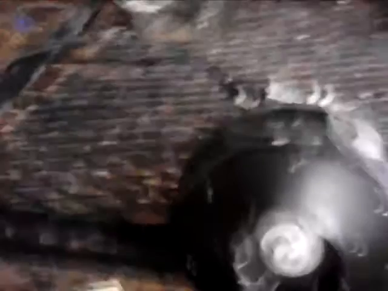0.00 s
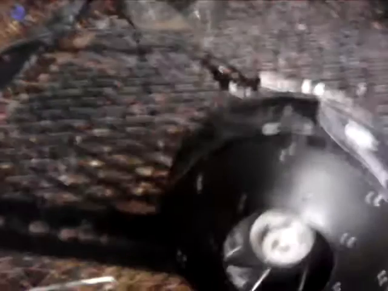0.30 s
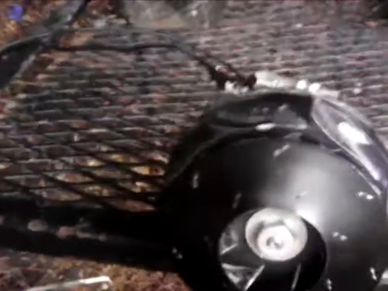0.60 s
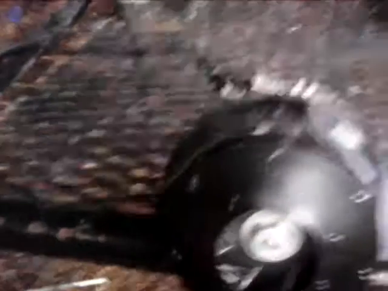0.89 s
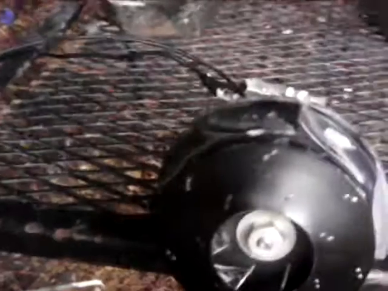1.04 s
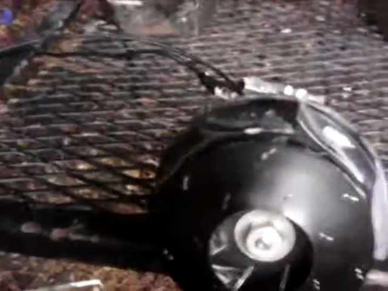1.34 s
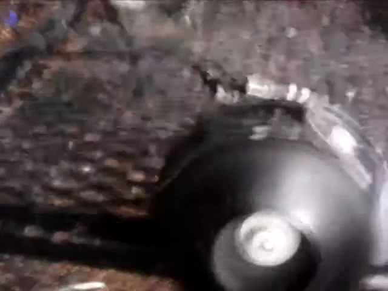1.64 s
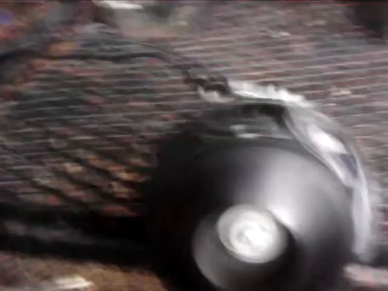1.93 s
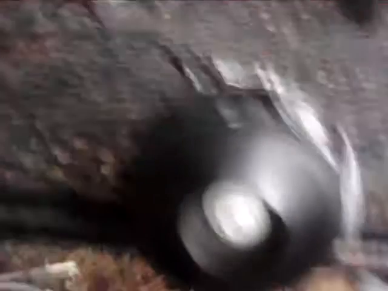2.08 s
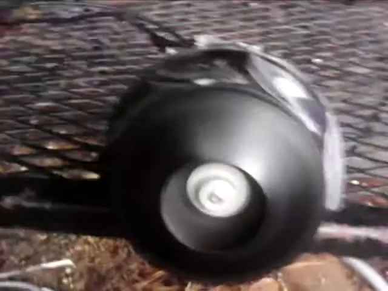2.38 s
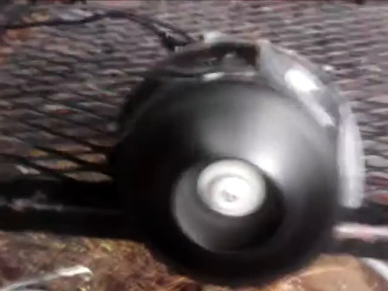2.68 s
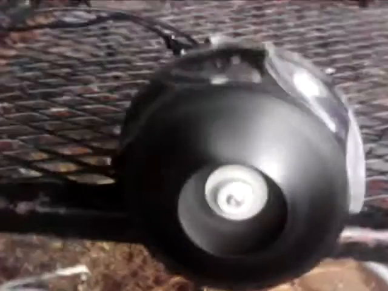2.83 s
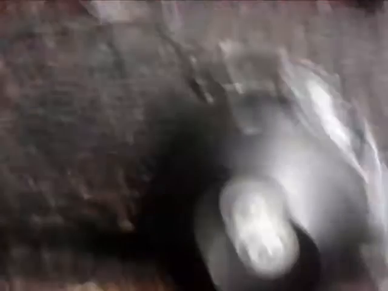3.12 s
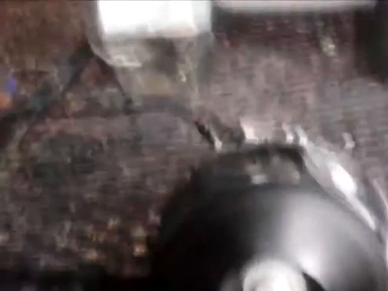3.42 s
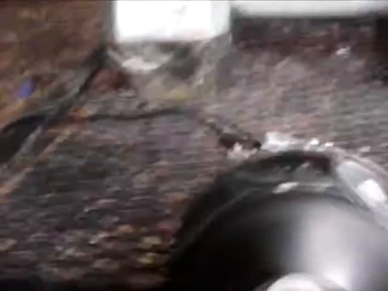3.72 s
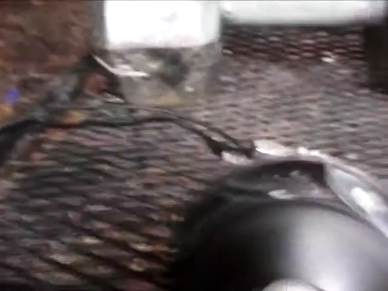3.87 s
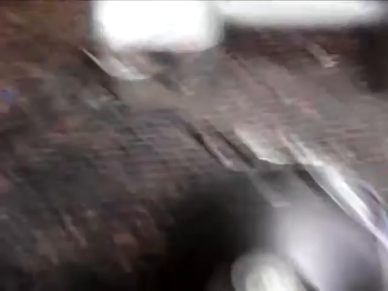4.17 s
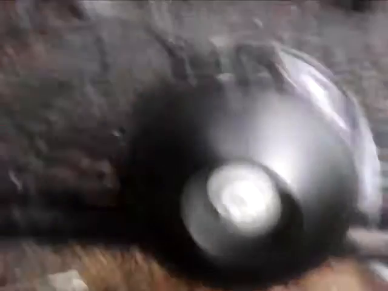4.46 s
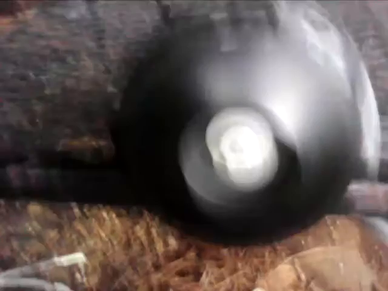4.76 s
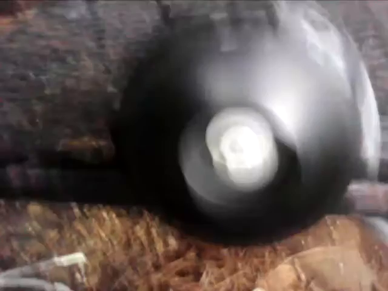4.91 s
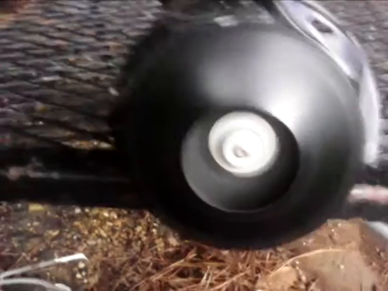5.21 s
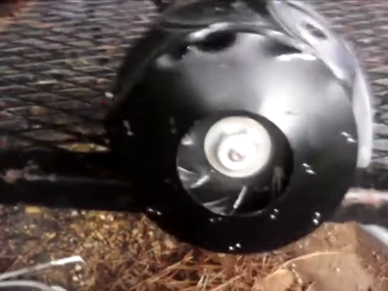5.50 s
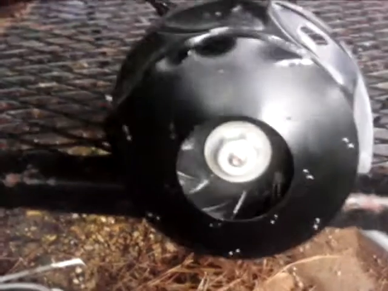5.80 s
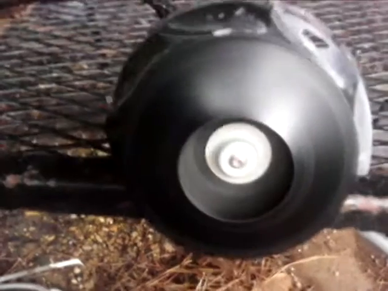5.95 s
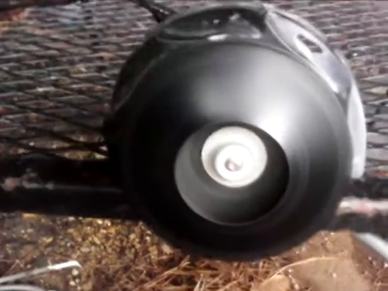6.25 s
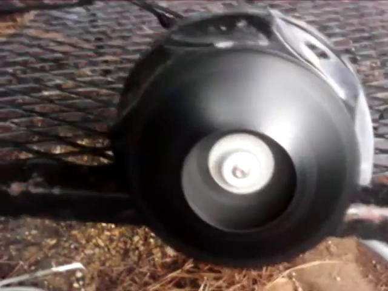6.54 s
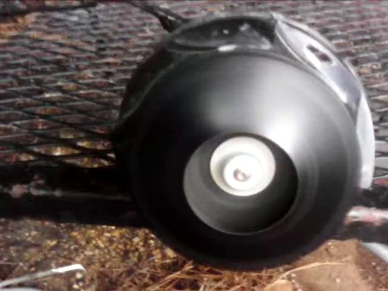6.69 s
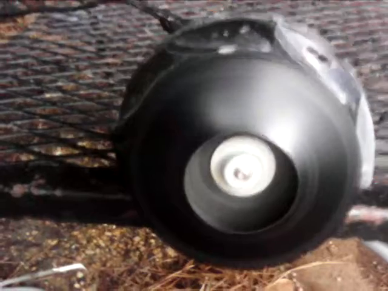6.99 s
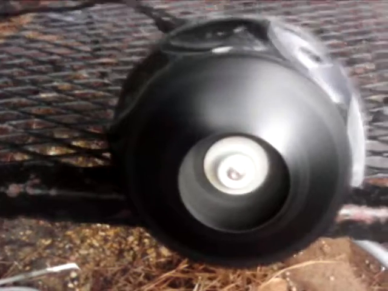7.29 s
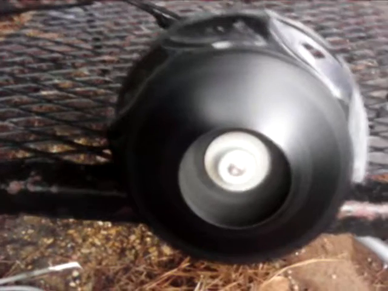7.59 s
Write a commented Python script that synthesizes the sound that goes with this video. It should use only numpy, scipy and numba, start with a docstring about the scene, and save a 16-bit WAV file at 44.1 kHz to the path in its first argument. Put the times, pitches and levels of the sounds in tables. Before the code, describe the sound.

Close up, a small electric fan motor is pulsed on and off, whining and rushing loudly upward, then coasting down each time.

```python
"""A bare vacuum cleaner motor on a mesh table, close to a hand-held mono microphone.
Faint handling ticks come first. From 1 s, three short bursts of current pull the rotor up and drag
slows it again; from 5.3 s, four longer ones follow. At each start the armature slots whine and make
the frame squeak; the fan's rush and the hum of imbalance rise and sink with speed, the brushes rub,
and the draught ruffles the microphone. Gain control holds the loud stretches level."""
import sys
import numpy as np
from scipy import signal
from scipy.fft import rfft, irfft
from scipy.io import wavfile
from numba import njit

SR = 44100
rng = np.random.default_rng(int(sys.argv[2]) if len(sys.argv) > 2 else 0)


def dump_mix(stems):
    """Bounce the given channels to the path in sys.argv[1] as a 16-bit WAV at rate SR."""
    frames = np.atleast_2d(stems).T  # one column per channel
    limited = np.clip(frames, -1, 1)  # hard clip at full scale
    pcm = np.round(limited * 32767).astype(np.int16)
    wavfile.write(sys.argv[1], SR, pcm)


N = 336042
TIME = np.arange(N) / SR

REFERENCE_RPS, PULL_KNEE_RPS, GRIP_RPS, CREEP_RPS = 270, 541.2, 64, 25
START_PULL_RPS_PER_S, PULL_EXPONENT = 10616, 3.94
AIR_RPS_PER_S, BEARING_RPS_PER_S, GRIP_RPS_PER_S = 175, 149.5, 395


@njit
def rotor_speed(torque):
    """Speed [rev/s]: current pulls the rotor up; air, bearings and brush grip brake it."""
    rps, v = np.zeros(len(torque)), 0.
    for i in range(len(torque)):
        pull = torque[i] * START_PULL_RPS_PER_S / (1 + v / PULL_KNEE_RPS) ** PULL_EXPONENT
        air = AIR_RPS_PER_S * (v / REFERENCE_RPS) ** 2
        bearings = BEARING_RPS_PER_S * v ** 2 / (v ** 2 + CREEP_RPS ** 2)
        grip = GRIP_RPS_PER_S * (v / GRIP_RPS) / (1 + (v / GRIP_RPS) ** 6)
        v += (pull - air - bearings - grip) / SR
        rps[i] = v
    return rps


# bursts of current: (on [s], off [s], torque [ratio], whine gain [dB])
BURSTS = [(1.043, 1.113, .957, -.5), (1.364, 1.458, .991, 4), (3.077, 3.199, .958, 3),
          (5.327, 6.02, 1, -.5), (6.214, 6.461, .993, 0), (6.774, 7.003, 1.005, 0), (7.268, 7.7, 1, 0)]


def motor():
    """The switch drives the rotor; speed and current drive each sound of the motor."""
    torque = sum(share * ((TIME > on) & (TIME < off)) for on, off, share, _ in BURSTS)
    whine_db = smooth(sum(db * ((TIME > on) & (TIME < off)) for on, off, _, db in BURSTS), .01)
    rps = np.maximum(rotor_speed(torque), 1e-3)
    speed_oct = np.log2(rps / REFERENCE_RPS)
    angle_rad = 2 * np.pi * np.cumsum(rps) / SR
    supply = smooth(smooth(1. * (torque > 0), .006), .006)
    current = supply / (1 + (rps / 370) ** 3)   # back-voltage lowers it
    flow = from_db(-14 + 13.34 * speed_oct)
    tones = room(flow * rotor_tones(angle_rad, rps), t60_s=.1, wet_db=-9)
    air = flow * fan_rush(speed_oct) + tones + brushes(rps, current)
    return shroud(air, speed_oct) + from_db(whine_db) * magnetic_whine(angle_rad, current)


# fan rush at the reference speed: (frequency [Hz], density [dB])
RUSH_SPECTRUM = [(100, -20), (300, -6.5), (520, -3.5), (760, -2), (1150, 0.5), (1400, -5), (3400, -2),
                 (4500, 3.5), (5300, 1), (7200, 5.5), (8200, -4), (11500, -9), (12700, -18), (13600, -18.5)]


def fan_rush(speed_oct, treble_db_per_oct=8.5, knee_hz=8000):
    """Impeller turbulence; its treble grows with speed."""
    def shelf(hz, s):
        treble_db = treble_db_per_oct * np.interp(s, TIME, np.maximum(speed_oct, -1.5))
        return from_db(treble_db * hz ** 4 / (hz ** 4 + knee_hz ** 4))
    return recolour(noise(RUSH_SPECTRUM), shelf)


# rotor tones: (order [x speed], level [dB], fades below [rev/s])
ROTOR_ORDERS = [(1, -8.5, 190), (2, -16, 227), (3, -20, 260), (4, -24, 110), (5, -22.5, 110),
                (6, -22.5, 100), (7, -19.5, 130), (8, -21, 220), (12, -22.5, 200), (13, -16.5, 100)]
# housing radiation: (frequency [Hz], gain [dB])
HOUSING_RESPONSE = [(70, -8), (180, 0.5), (265, 2.5), (370, -0.5), (470, 0), (620, 0.5), (740, 7),
                    (950, -1), (1250, 0.5), (1850, 1), (2400, -2.5), (3100, 3.5), (3800, -2), (4700, -1),
                    (6000, 4)]


def rotor_tones(angle_rad, rps, ruffle_depth=.15, swing_db=2.4):
    """Imbalance and fan blades sound at multiples of the speed, ruffled by the air."""
    out = np.zeros(N)
    for order, db, fade_rps in ROTOR_ORDERS:
        swing = rms_one(from_db(swing_db * (1 - 1 / order) * wander(.02)))
        ruffle = 1 + ruffle_depth * wander(.003)
        tone = np.sqrt(2) * np.sin(round(order) * angle_rad + rng.uniform(0, 2 * np.pi))
        gain = from_db(db) * at_hz(HOUSING_RESPONSE, order * rps) / (1 + (fade_rps / rps) ** 4)
        out += gain * swing * ruffle * tone
    return out


# frame modes: (frequency [Hz], width [Hz], field-driven gain [dB], brush-rubbed level [dB])
FRAME_MODES = [(1994, 20, 7, 5.5), (2170, 100, -26.5, -1.5), (3300, 380, -10, -12),
               (4120, 280, -3.5, -12.5), (5330, 280, -34, -4), (6695, 350, -32.5, -12.5)]


def magnetic_whine(angle_rad, current, slots=12, chatter_depth=.26, mains_hz=60, hum_db=-26.5):
    """The field tugs at each passing slot; the sweep rings the frame modes in turn, over mains hum."""
    brush_chatter = 1 + chatter_depth * rms_one(smooth(rng.standard_normal(N), .0008))
    pull = current ** 2 * brush_chatter * np.sin(slots * angle_rad)
    ringing = sum(from_db(db) * frame_mode(pull, hz, width_hz, skirt_hz=600)
                  for hz, width_hz, db, _ in FRAME_MODES)
    hum = from_db(hum_db) * current ** 4 * np.sin(2 * np.pi * 2 * mains_hz * TIME)
    return ringing + hum


# brush scrapes as the rotor creeps to rest: (time [s], level [dB])
BRUSH_SCRAPES = [(2.9, -84.5), (4.56, -75)]


def brushes(rps, current, spark_db=-30.5, rub_db=-46.5, grip_db=-33, glide_rps=115):
    """The brushes fizz under current; their friction rings the frame."""
    sparks = from_db(spark_db) * current ** 2 * noise(RUSH_SPECTRUM)
    friction = rng.standard_normal(N)
    ringing = sum(from_db(db) * rms_one(frame_mode(friction, hz, width_hz, skirt_hz=900))
                  for hz, width_hz, _, db in FRAME_MODES)
    rubbing = from_db(rub_db) / (1 + (glide_rps / rps) ** 2.7)
    gripping = from_db(grip_db) * current ** 2
    return sparks + (rubbing + swells(BRUSH_SCRAPES, sigma_s=.11) + gripping) * ringing


# colour at the moving microphone: (time [s], inlet [Hz], notch [Hz], notch depth [ratio], beam [dB])
SHROUD_COLOUR = [(1.2, 2420, 3130, 0.55, -3), (1.7, 2560, 3320, 0.85, -5), (3.3, 2344, 3070, 0.7, -2),
                 (4.2, 2245, 3150, 0.68, -2.5), (5.4, 2550, 3160, 0.54, -4.5), (5.78, 2650, 3160, 0.78, -5),
                 (6.2, 2500, 3140, 0.79, -5)]


def shroud(x, speed_oct, inlet_max_db=7.5, inlet_db_per_oct=6.5, beam_hz=6350):
    """The inlet cavity lifts one band with flow, paths round the shroud cancel another; treble beams."""
    def response(hz, s):
        def bell(centre_hz, width_hz):
            return 1 / (1 + (2 * (hz - centre_hz) / width_hz) ** 2)
        inlet_hz, notch_hz, depth, beam_db = in_time(SHROUD_COLOUR, s)
        inlet_db = inlet_max_db + inlet_db_per_oct * np.clip(np.interp(s, TIME, speed_oct), -1.5, 0)
        gain_db = inlet_db * bell(inlet_hz, width_hz=750) + beam_db * bell(beam_hz, width_hz=2000)
        return from_db(gain_db) * (1 - depth * bell(notch_hz, width_hz=230))
    return recolour(x, response)


# microphone rumble: (frequency [Hz], density [dB])
RUMBLE_SPECTRUM = [(20, 3.5), (40, -0.5), (65, -5.5), (100, -2), (170, -10.5), (280, -18.5), (600, -21.5),
                   (2000, -45)]
# low thumps on the microphone, from gusts of air or handling: (time [s], level [dB])
MIC_THUMPS = [(1.97, -25), (4.04, -34), (4.48, -58), (6.981, -24), (7.151, -36.5)]
# handling rumble: (time [s], level [dB])
HANDLING_LEVELS = [(0, -69.5), (.5, -66.5), (1.0, -58), (2.7, -60.5), (3.0, -65.5), (4.5, -54), (5.0, -65),
                   (5.3, -62)]


def draught(rps, level_db=-36, gust_db=1.7, gust_s=.027, fade_rps=53, air_lag_s=.044):
    """The fan's outflow ruffles the microphone, over low thumps and handling rumble."""
    flow = 1 / (1 + (fade_rps / rps) ** 4)
    outflow = from_db(level_db + gust_db * wander(gust_s)) * flow * smooth(flow, air_lag_s)
    thumps = swells(MIC_THUMPS, sigma_s=.0073)
    handling = from_db(in_time(HANDLING_LEVELS)[0])
    return (outflow + thumps + handling) * noise(RUMBLE_SPECTRUM)


# handling ticks: (time [s], level [dB])
TICK_EVENTS = [(0.171, -42), (0.41, -57), (0.582, -58), (0.709, -51), (0.732, -49), (0.841, -51),
               (0.854, -50)]
# modes of a tick: (frequency [Hz], level [dB], t60 [s])
TICK_RESONANCES = [(820, -1, 0.028), (925, 1, 0.02), (1080, -5, 0.026), (1780, -18, .02)]


def handling_ticks(contact_s=.0026):
    """Soft contacts ring a few damped modes."""
    out = np.zeros(N)
    t = TIME[:SR // 10]
    attack = 1 - np.exp(-t / contact_s)
    for s, db in TICK_EVENTS:
        knock = sum(from_db(mode_db - 60 * t / t60_s) * np.sin(2 * np.pi * hz * t + rng.uniform(0, 2.4))
                    for hz, mode_db, t60_s in TICK_RESONANCES)
        start = int(s * SR)
        out[start:start + len(t)] += from_db(db) * knock * attack
    return out


# background noise: (frequency [Hz], density [dB])
AMBIENCE_SPECTRUM = [(88, -24), (150, -1), (525, -7), (566, -11), (876, -9.5), (1020, -7.5), (2440, -20.5),
                     (3640, -28.5), (5520, -31), (14000, -33)]


def ambience(level_db=-75):
    """Faint, steady background noise."""
    return from_db(level_db) * noise(AMBIENCE_SPECTRUM)


def room(x, t60_s, wet_db):
    """Dense short reflections make gliding tones flutter."""
    t = TIME[:SR // 3]
    echoes = rng.standard_normal(len(t)) * from_db(-60 * t / t60_s) * (t > .003)
    return x + from_db(wet_db) * signal.fftconvolve(x, echoes / np.linalg.norm(echoes))[:N]


def frame_mode(x, hz, width_hz, skirt_hz):
    """Two unity-peak resonators in series; the broader keeps the frame quiet between modes."""
    for band_hz in (width_hz, skirt_hz):
        r = np.exp(-np.pi * band_hz / SR)
        feedback = [1, -2 * r * np.cos(2 * np.pi * hz / SR), r * r]
        x = signal.lfilter(np.array([1, 0, -1]) * (1 - r * r) / 2, feedback, x + 1e-18)
    return x


def recolour(x, gain_at):
    """Slowly moving filter with response gain_at(Hz column, s row)."""
    hz, s, frames = signal.stft(x, SR, nperseg=512)
    return signal.istft(frames * gain_at(hz[:, None], s), SR)[1][:N]


def noise(spectrum):
    """Coloured noise, rms 1."""
    hz = np.maximum(np.fft.rfftfreq(N, 1 / SR), 1)
    gain = at_hz(spectrum, hz) * np.minimum(hz / spectrum[0][0], 1) ** 2
    return rms_one(irfft(rfft(rng.standard_normal(N)) * gain, N))


def wander(lag_s):
    """Random drift, rms 1."""
    return rms_one(smooth(smooth(rng.standard_normal(N), lag_s), lag_s))


def swells(events, sigma_s):
    """A Gaussian gain pulse per (time [s], level [dB])."""
    return sum(from_db(db) * np.exp(-.5 * ((TIME - s) / sigma_s) ** 2) for s, db in events)


def smooth(x, lag_s):
    """One-pole lag."""
    r = np.exp(-1 / (lag_s * SR))
    return signal.lfilter([1 - r], [1, -r], x + 1e-18)


def at_hz(spectrum, hz):
    """Gain of a spectrum, interpolated in log frequency."""
    points_hz, db = np.transpose(spectrum)
    return from_db(np.interp(np.log(hz), np.log(points_hz), db))


def in_time(rows, at_s=TIME):
    """Table columns, interpolated in time."""
    s, *columns = np.transpose(rows)
    return [np.interp(at_s, s, column) for column in columns]


def from_db(db):
    """Decibels to gain."""
    return 10 ** (np.asarray(db) / 20)


def rms_one(x):
    """Scale to unit rms."""
    return x / np.sqrt(np.mean(x ** 2) + 1e-20)


def scene():
    """Motor over draught, ticks and ambience; both channels alike."""
    torque = sum(share * ((TIME > on) & (TIME < off)) for on, off, share, _ in BURSTS)
    rps = np.maximum(rotor_speed(torque), 1e-3)
    return (motor() + ambience() + draught(rps) + handling_ticks()) * np.ones((2, 1))


def gain_control(x, ceiling_db=-12.5, sense_s=.005, attack_s=.004, release_db_per_s=62.5):
    """Gain drops fast above the ceiling and recovers slowly."""
    over_db = np.maximum(10 * np.log10(smooth(x[0] ** 2, sense_s)) - ceiling_db, 0)
    held_db = np.maximum.accumulate(over_db + release_db_per_s * TIME) - release_db_per_s * TIME
    return x * from_db(-smooth(held_db, attack_s))


def record(dry):
    """Gain control, soft clipping and a steep low-pass."""
    peak_limit, cutoff_hz = .73, 13900
    levelled = gain_control(dry)
    rounded = levelled / (1 + (levelled / peak_limit) ** 6) ** (1 / 6)
    return signal.sosfilt(signal.ellip(12, .1, 80, cutoff_hz, fs=SR, output="sos"), rounded)


dry = scene()
out = record(dry)
dump_mix(out)
```